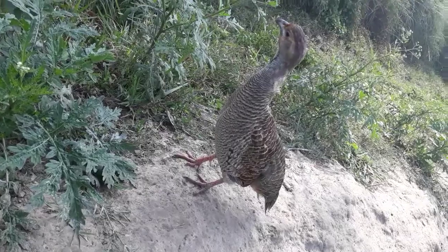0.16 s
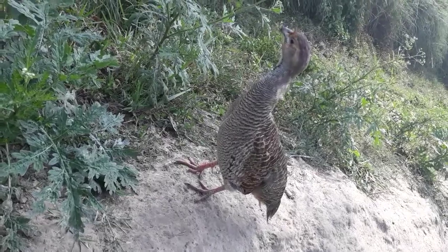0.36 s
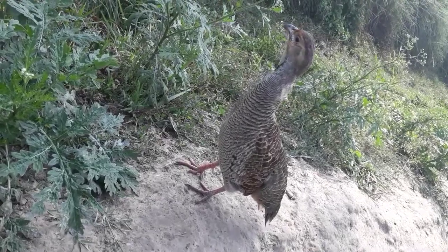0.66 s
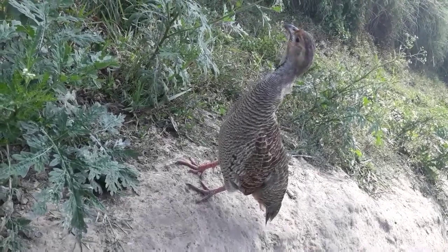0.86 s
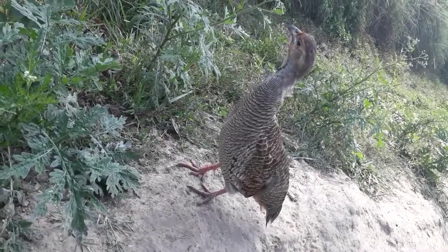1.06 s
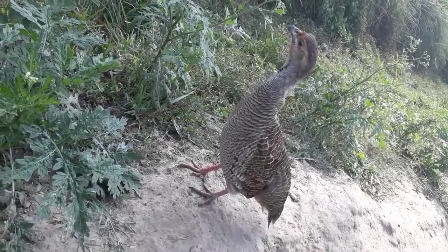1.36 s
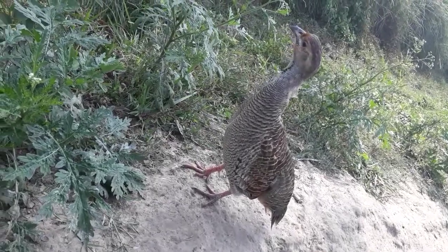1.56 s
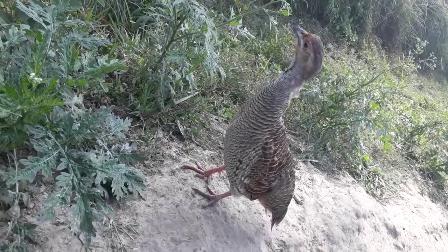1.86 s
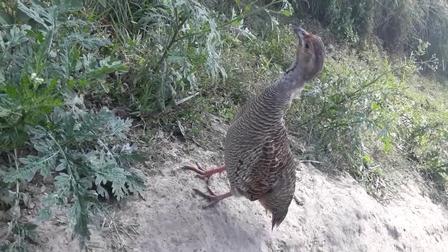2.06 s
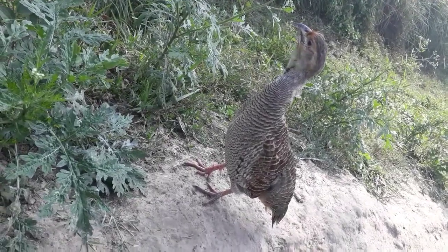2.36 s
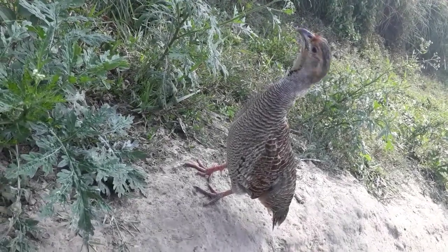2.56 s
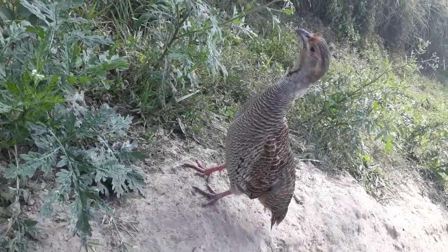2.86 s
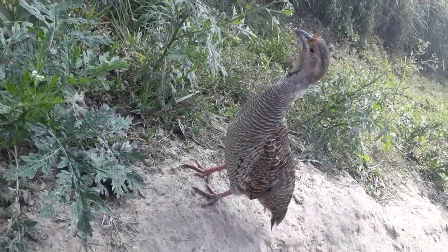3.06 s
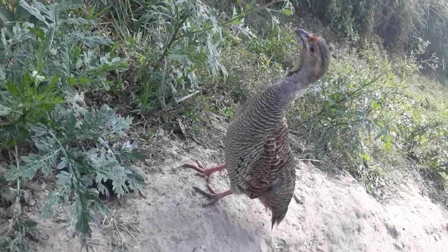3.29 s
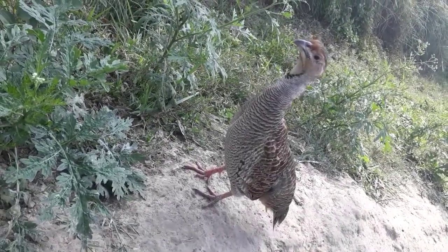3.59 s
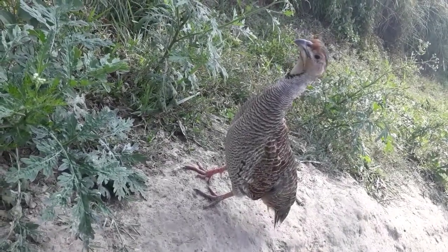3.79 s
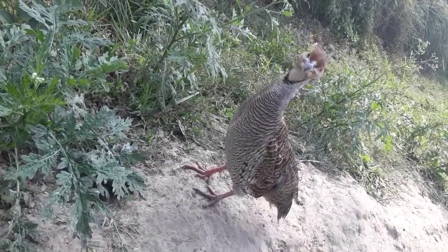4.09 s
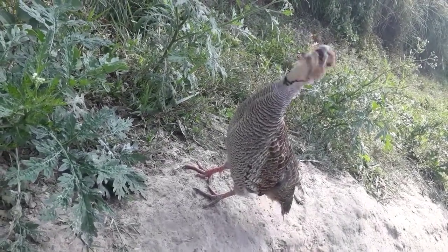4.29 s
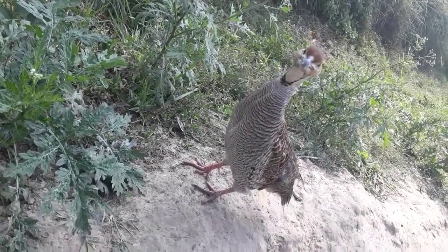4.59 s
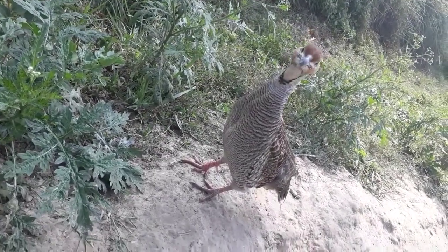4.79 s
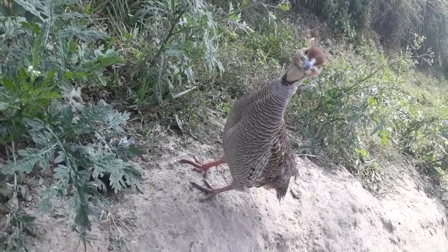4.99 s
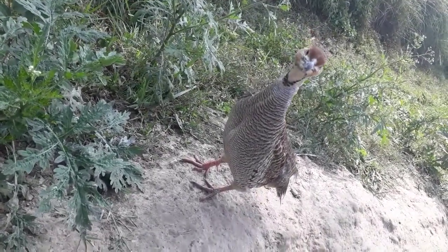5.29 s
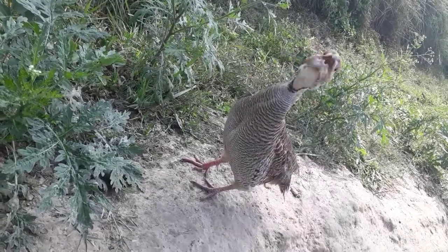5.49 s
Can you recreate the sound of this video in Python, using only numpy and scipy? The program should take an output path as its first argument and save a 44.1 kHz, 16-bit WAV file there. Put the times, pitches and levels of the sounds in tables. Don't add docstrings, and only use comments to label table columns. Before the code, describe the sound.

Four sharp, clicky, throaty game bird yelps ring out outdoors, separated by gritty scuffs on sand over a soft, low open-air rumble.

```python
import sys
import numpy as np
from scipy import signal
from scipy.fft import rfft, irfft
from scipy.io import wavfile
from scipy.ndimage import uniform_filter1d, map_coordinates

SR = 44100
rng = np.random.default_rng(int(sys.argv[2]) if len(sys.argv) > 2 else 0)


def linear_from_db(decibels):
    return 10 ** (np.asarray(decibels, float) / 20)


def digitize_waveform(pressure):
    field = np.atleast_2d(pressure).T
    bounded = np.clip(field, -1, 1)
    quanta = np.round(bounded * 32767).astype(np.int16)
    wavfile.write(sys.argv[1], SR, quanta)


N = 248763

# frequency in Hz, level in dB per Hz.
RASP_SPECTRUM = [(250, -43.5), (650, 2.5), (1800, 2), (2600, -4.5), (3800, -17.5), (4900, -6.5),
                 (6500, -30.5), (8000, -31.5), (10800, -17), (14000, -28), (15500, -61.5)]


def unit(x):
    return x / np.sqrt(np.mean(x ** 2) + 1e-20)


def along(points, hz):
    f, v = np.transpose(points)
    return np.interp(np.log(hz + 1), np.log(f + 1), v)


def span(rows):
    s, *columns = np.transpose(rows)
    i = np.arange(round(s[0] * SR), min(round(s[-1] * SR), N))
    return i[0], [np.interp(i / SR, s, column) for column in columns]


def add(track, start, piece):
    track[start:start + len(piece)] += piece[:len(track) - start]


def wobble(rate, size=N):
    knots = rng.standard_normal(int(size * rate / SR) + 4)
    return map_coordinates(knots, [np.arange(size) * rate / SR])


def coloured(x, spectrum):
    gain = linear_from_db(along(spectrum, np.fft.rfftfreq(N, 1 / SR)))
    return unit(irfft(rfft(x) * gain, N))


def swell(rise, t60):
    t = np.arange(SR // 2) / SR
    return np.where(t < rise, t / rise, linear_from_db(-60 * (t - rise) / t60))


def air():
    # time in seconds, level in
    # dB.
    breeze = [(0, 0.5), (.7, 0), (1.2, -1), (1.5, 2.5), (2.1, -1), (2.48, 4), (2.95, 0), (3.36, 2),
              (3.8, -1), (4.1, 0), (4.45, -1.5), (5.5, -2), (5.64, -3)]
    # frequency in Hz, level in dB per Hz.
    rumble_spectrum = [(12, -53.5), (20, -28.5), (48, -8.5), (86, 0), (184, -5.5), (216, -14), (330, -22),
                       (430, -46.5), (730, -120)]
    # frequency in Hz, level in dB per Hz.
    leaf_spectrum = [(150, -32.5), (250, -0.5), (480, -7), (710, -6), (1000, -10), (1400, -7), (2000, -14),
                     (4900, -16), (5600, -15), (6800, -16.5), (7300, -13.5), (7900, -22.5), (9000, -15),
                     (11500, -16.5), (15800, -29.5)]
    buzz_spectrum = [(9200, -41), (9750, -4.5), (10300, 2.5), (10700, -5.5), (11200, -30.0)]  # (Hz, dB)
    breeze_db = np.interp(np.arange(N) / SR, *np.transpose(breeze))
    rumble_db = -53 + .5 * breeze_db + 1.5 * wobble(5)
    hiss_db = -61 + breeze_db + .25 * wobble(4.3)
    buzz_db = -64 + .8 * wobble(2.8)
    rumble = coloured(rng.standard_normal(N), rumble_spectrum)
    hiss = coloured(rng.standard_normal(N), leaf_spectrum)
    pulse_hz = 151.3 + .6 * wobble(2)
    beat = np.cos(np.pi * np.cumsum(pulse_hz) / SR) ** 2
    wing_hz = 10280 + 750 * wobble(2500)
    wing = np.sin(2 * np.pi * np.cumsum(wing_hz) / SR) + rng.standard_normal(N)
    buzz = coloured(wing * (.42 + beat ** 2), buzz_spectrum)
    return linear_from_db(rumble_db) * rumble + linear_from_db(hiss_db) * hiss + linear_from_db(buzz_db) * buzz


def far_birds():
    # start in seconds, length in seconds, level in dB.
    whistles = [
        (.836, 0.163, -62),
        (.984, 0.0535, -67),
        (1.09, 0.16, -73),
        (1.423, 0.171, -59.5),
        (1.675, .15, -67.5),
        (2.033, 0.197, -61),
    ]
    # start in seconds, length in seconds, first Hz, last Hz, level in dB.
    chirps = [
        (1.04, 0.034, 667.4, 663, -65.5),
        (1.087, 0.035, 3250, 3199, -66.5),
        (1.104, .04, 3104, 2930, -68),
        (1.171, 0.0306, 3350, 3607, -57.5),
        (1.179, 0.0647, 3646, 2756, -60.5),
        (2.029, .03, 3410, 2680, -71),
        (4.076, .015, 4500, 4400, -65.5),
        (4.235, 0.013, 4390, 4400, -67.5),
    ]
    # start in seconds, length in seconds, first Hz, last Hz, level in dB.
    twitters = [
        (0.454, 0.0483, 5857, 3460, -59.5),
        (.969, .06, 5630, 5605, -69),
        (1.532, 0.09, 2185, 2180, -67),
        (1.756, 0.026, 5030, 3700, -63),
        (2.847, .035, 5480, 4579, -64),
        (2.95, 0.03, 4670, 4195, -67),
        (3.629, 0.0974, 2302, 2279, -68.5),
        (5.066, .022, 4905, 4900, -64.5),
        (5.101, .067, 5404, 4993, -69),
    ]
    whistle_hz, sag_hz_per_s = 1309.2, 220
    calls = [(s, length, whistle_hz, whistle_hz - sag_hz_per_s * length, db, 38) for s, length, db in whistles]
    calls += [(*row, 28) for row in chirps]
    calls += [(*row, .03 * row[2]) for row in twitters]
    out = np.zeros(N)
    for s, length, hz0, hz1, db, blur_hz in calls:
        n = round(length * SR)
        hz = np.linspace(hz0, hz1, n) + blur_hz * wobble(60 + 4 * blur_hz, size=n)
        fade = signal.windows.tukey(n, .55) * linear_from_db(1.5 * wobble(60, size=n))
        add(out, round(s * SR), np.sqrt(2) * linear_from_db(db) * fade * np.sin(2 * np.pi * np.cumsum(hz) / SR))
    return out


def bushes(x):
    # frequency in Hz, reverberation time T60 in seconds.
    decay = [(500, .08), (1400, .25), (5000, 0.14), (12000, .06)]
    # delay in seconds, level in dB, resonance in Hz.
    echoes = [
        (.044, -38, 5300),
        (.05, -39, 3100),
        (.062, -42, 5000),
        (.077, -42, 1450),
    ]
    hz, t, z = signal.stft(rng.standard_normal(SR // 2), SR, nperseg=256)
    fading = z * linear_from_db(-60 * t / along(decay, hz)[:, None])
    tail = signal.istft(fading, SR, nperseg=256)[1]
    near = rng.standard_normal(len(tail)) * linear_from_db(-60 * np.arange(len(tail)) / SR / .06)
    response = linear_from_db(-39) * tail / np.linalg.norm(tail) + linear_from_db(-18.5) * near / np.linalg.norm(near)
    late = 200
    for delay, db, hz in echoes:
        t = np.arange(round(22 * SR / hz)) / SR
        hollow = np.hanning(len(t)) * np.sin(2 * np.pi * hz * t)
        add(response, round(delay * SR) - late - len(t) // 2, linear_from_db(db) * hollow * 4 / len(t))
    return signal.fftconvolve(np.pad(x, (late, 0)), response)[:N]


def scuffs():
    # frequency in Hz, level in dB per Hz.
    heel_spectrum = [(530, -37), (900, -8), (1470, 1), (1780, -9.5), (2710, -4.5), (3370, -0.5),
                     (4330, -7.5), (4760, -25), (5840, -2.5), (8270, -19), (10800, -12.5), (14200, -22),
                     (15800, -41)]
    thud_spectrum = [(71, -36.5), (120, -5), (424, 3.5), (577, -4.5), (990, -17), (1200, -16.5),
                     (1560, -44.5), (2640, -120)]
    drag_spectrum = [(530, -47.5), (900, -16.5), (1270, -11), (1960, -15), (2130, -8.5), (3210, -6),
                     (4490, -8), (7160, -2.5), (15800, -18)]
    spray_spectrum = [(7000, -44.5), (9500, -8), (12500, -1), (15000, -9), (15800, -21)]
    # start in seconds, rise in seconds, T60 in seconds, thud in dB, heel grit in dB.
    steps = [(1.335, 0.04, .2, -58, -54), (1.4, .0105, 0.065, -23.5, -32.5), (2.169, .004, .066, -62, -54),
             (2.215, 0.0068, 0.076, -74, -58), (2.341, 0.021, 0.242, -47.5, -46.5),
             (3.326, .018, 0.0611, -28, -33), (4.1098, .0022, 0.0369, -35, -39),
             (4.116, .0079, .044, -43.5, -45.5), (4.595, 0.00467, 0.12, -51, -65),
             (4.655, 0.00947, 0.059, -58, -63.5), (4.94, 0.0243, 0.294, -57, -63.5)]
    # start in seconds, level in dB.
    drags = [
        (.46, -64),
        (1.424, -40.5),
        (2.343, -45.5),
        (2.386, -48.5),
        (2.413, -55.5),
        (3.358, -42),
        (4.111, -52.5),
        (4.13, -47),
    ]
    # start in seconds, rise in seconds, T60 in seconds, level in dB.
    sprays = [
        (2.345, .02, .12, -51),
        (4.11, .003, .03, -44),
        (4.135, .02, .2, -55),
        (1.4, .011, .05, -55),
    ]
    spectra = heel_spectrum, thud_spectrum, drag_spectrum, spray_spectrum
    layers = []
    for spectrum in spectra:
        grains = rng.standard_normal(N) * linear_from_db(3 * wobble(700))
        layers.append(coloured(grains, spectrum))
    envelopes = np.zeros((4, N))
    heel, thud, drag, spray = envelopes
    for s, rise, t60, thud_db, heel_db in steps:
        add(thud, round(s * SR), linear_from_db(thud_db) * swell(rise, t60))
        add(heel, round(s * SR), linear_from_db(heel_db) * swell(rise, t60))
    drag_shape = swell(.013, .19)
    for s, db in drags:
        add(drag, round(s * SR), linear_from_db(db) * drag_shape)
        add(thud, round(s * SR), linear_from_db(db - 13) * drag_shape)
    for s, rise, t60, db in sprays:
        add(spray, round(s * SR), linear_from_db(db) * swell(rise, t60))
    return (envelopes * np.array(layers)).sum(axis=0)


def rattles():
    # start in seconds, end in seconds, last click in dB, last ring in Hz.
    bursts = [
        (0.536, 0.552, -6, 1250),
        (2.4762, 2.493, -3.5, 1300),
        (4.313, 4.326, -1.5, 1200),
        (5.5395, 5.558, -3, 1350),
    ]
    first_db, first_hz, clicks_per_s = -12.5, 1060, 315
    out, t = np.zeros(N), np.arange(round(.02 * SR)) / SR
    rasp = coloured(rng.standard_normal(N), RASP_SPECTRUM)
    for s0, s1, last_db, last_hz in bursts:
        chance = rng.standard_normal((12, 3))
        uneven = .00024 * chance[:, 0] * (np.arange(12) > 0)
        times = s0 + np.arange(12) / clicks_per_s + uneven
        for s, (_, size, bend) in zip(times[times < s1], chance):
            u = (s - s0) / (s1 - s0)
            start = round(s * SR)
            hz = (first_hz + u * (last_hz - first_hz)) * (1 + .04 * bend)
            pipe = linear_from_db(-60 * t / .014) * np.sin(2 * np.pi * hz * t) * (1 - np.exp(-t / .00015))
            beak = linear_from_db(-60 * t / .015) * (1 - np.exp(-t / .0009)) * rasp[start:][:len(t)]
            effort = u ** .41
            free = np.clip((s1 + .004 - s - t) / .004, 0, 1)
            click_db = first_db + effort * (last_db - first_db) + 1.7 * size
            add(out, start, linear_from_db(click_db) * (pipe + .5 * effort * beak) * free)
    return out


def notes():
    # time in seconds, pitch in Hz, fundamental in dB.
    registers = [
        [(.552, 1229, -18), (.558, 1290, -8.5), (.567, 1345, -8), (.576, 1303, -7.5), (.584, 1228, -7.5),
         (.596, 1040, -8.5), (.598, 1030, -19.5)],
        [(2.494, 1296, -17.5), (2.499, 1375, -8.5), (2.515, 1444, -6.5), (2.526, 1396, -8),
         (2.5295, 1375, -13.5)],
        [(2.5295, 1597, -12.5), (2.534, 1627, -16), (2.538, 1570, -21), (2.54, 1492, -36)],
        [(4.325, 1190, -17.5), (4.334, 1362, -8.5), (4.343, 1433, -10), (4.357, 1443, -12.5),
         (4.3615, 1408, -16)],
        [(4.3615, 1584, -11.5), (4.366, 1659, -9), (4.374, 1599, -13), (4.379, 1454, -19.5)],
        [(5.558, 1413, -14.5), (5.564, 1429, -9), (5.572, 1502, -22), (5.5755, 1530, -18.5), (5.5785, 1690, -5),
         (5.583, 1830, -8), (5.593, 1825, -7), (5.608, 1679, -10), (5.6145, 1569, -19.5)],
    ]
    # overtones in dB, shrillness in dB, shrillness lost in dB per Hz of sag.
    beak = [
        (-8.5, 3.5, 0.31),
        (-3.5, 0, .15),
        (1.5, -6, 0.02944),
        (-0.5, 1, .03),
        (2, -1.5, 0.014),
        (1.5, -1, -.02),
    ]
    # frequency in Hz, level in dB.
    throat = [(2000, -33.5), (2900, -20.5), (3500, -25), (4000, -32), (4310, -41.5), (4650, -32.5),
              (5300, -19.5), (5900, -46), (6900, -48.5), (8400, -40.5), (10000, -30), (11600, -29),
              (13000, -49), (15000, -58)]
    out = np.zeros(N)
    breath = coloured(rng.standard_normal(N), [(200, -59.5)] + throat + [(15800, -93.5)])
    for rows, (open_db, bright_db, dulls) in zip(registers, beak):
        start, (hz, db) = span(rows)
        n = len(hz)
        t = np.arange(n) / SR
        hz = uniform_filter1d(hz, size=130, mode="nearest")
        sunk_hz = np.clip(np.maximum.accumulate(hz) - hz - 39.6, 0, None)
        shut = np.exp(-t / .006)
        over_db = open_db - .018 * sunk_hz - 5 * shut
        shrill_db = bright_db - dulls * sunk_hz - 16 * shut
        settling = np.exp(-t / .0034)
        sliding = np.clip(np.gradient(hz) * SR / 30000 - .6, 0, 1)
        hoarse = np.maximum(settling, uniform_filter1d(sliding, size=90))
        jitter = .003 * wobble(400, size=n) + .05 * hoarse * wobble(1500, size=n)
        phase = 2 * np.pi * np.cumsum(hz * (1 + jitter)) / SR
        tone = linear_from_db(db) * np.sin(phase)
        for k in range(2, 13):
            level_db = over_db + along(throat, k * hz) + shrill_db * (k > 4) + 2.4 * wobble(70, size=n)
            audible = k * hz < 15300
            tone += linear_from_db(level_db) * audible * np.sin(k * phase + rng.uniform(0, 2 * np.pi))
        tone += linear_from_db(over_db - 45 + 17 * hoarse) * breath[start:start + n]
        add(out, start, np.sqrt(2) * tone * signal.windows.tukey(n, .0015 * SR / n))
    return out


def rings():
    # time in seconds, first ring in dB, first ring in Hz, fading in dB per second.
    releases = [
        (.598, -11, 1049, 1099.5),
        (2.54, -4, 1141, 800),
        (4.3791, -4.5, 1120, 797.5),
        (5.6154, -5, 1192, 899.5),
    ]
    slack_hz, slacken_s = 860, .011
    first_gap_s, gap_s, first_ring_s, ring_s = .0078, .0047, .0075, .0038
    out, rasp = np.zeros(N), coloured(rng.standard_normal(N), RASP_SPECTRUM)
    for s0, first_db, first_hz, fade_db in releases:
        for k, (late, size, long) in enumerate(rng.standard_normal((6, 3))):
            after = (k > 0) * (first_gap_s + (k - 1 + .15 * late) * gap_s)
            start = round((s0 + after) * SR)
            db = first_db - fade_db * after + 1.5 * size * (k > 0)
            hz = slack_hz + (first_hz - slack_hz) * np.exp(-after / slacken_s)
            length = ring_s * (1 + .08 * long) if k else first_ring_s
            t = np.arange(max(min(round(2.5 * length * SR), N - start), 0)) / SR
            u = 3 * t / length
            shape = u ** 1.7 * np.exp(1.5 * (1 - u))
            phase = 2 * np.pi * hz * t * (1 - .017 * t / length)
            voice = np.sin(phase) + linear_from_db(-24.5) * np.sin(2 * phase + 1) + linear_from_db(-35.5) * np.sin(3 * phase)
            puff = linear_from_db(-26.5) * rasp[start:][:len(t)]
            for puff_hz, puff_db in [(400, -24.5), (780, -15), (4850, -40.5)]:
                puff += linear_from_db(puff_db) * np.sin(2 * np.pi * puff_hz * t)
            add(out, min(start, N), linear_from_db(db) * shape * (voice + puff))
    return out


def cricket():
    # start in seconds, end in seconds, full level in dB.
    trills = [
        (0.682, 1.664, -60.5),
        (3.639, 4.545, -60.5),
    ]
    from_hz, to_hz, swell_db = 8960, 9440, 15
    out = np.zeros(N)
    for s0, s1, full_db in trills:
        start, (done,) = span([(s0, 0), (s1, 1)])
        warm = np.clip(done / .6, 0, 1)
        hz = from_hz + (to_hz - from_hz) * np.sin(np.pi / 2 * done)
        db = full_db - swell_db * (1 - warm) ** 1.24
        cycle = ((np.arange(len(hz)) - len(hz)) / SR * 59.1) % 1
        stroke = np.clip((cycle - .36) / .62, 0, 1)
        slide_hz = hz - 700 * stroke ** 3.5
        chirp = np.sin(np.pi * stroke) ** .8 * np.sin(2 * np.pi * np.cumsum(slide_hz) / SR)
        add(out, start, 2 * linear_from_db(db) * chirp)
    return out


def scene():
    bird = rattles() + notes() + rings()
    bird = signal.sosfilt(signal.butter(2, 260, "high", fs=SR, output="sos"), bird)
    far = far_birds()
    near_sounds = bird + bushes(bird) + scuffs()
    field = air() + far + linear_from_db(14.0) * bushes(far) + cricket()
    return (near_sounds + field)[None]


def roll_off(x):
    return signal.sosfilt(signal.butter(12, 16440, fs=SR, output="sos"), x)


def record(dry):
    soft = dry / (1 + np.abs(dry / .97) ** 8) ** (1 / 8)
    in_band = np.fft.rfftfreq(N, 1 / SR) < 15830
    kept = irfft(rfft(soft) * in_band, N)
    return roll_off(kept)


dry = scene()
out = record(dry)
digitize_waveform(out)
```